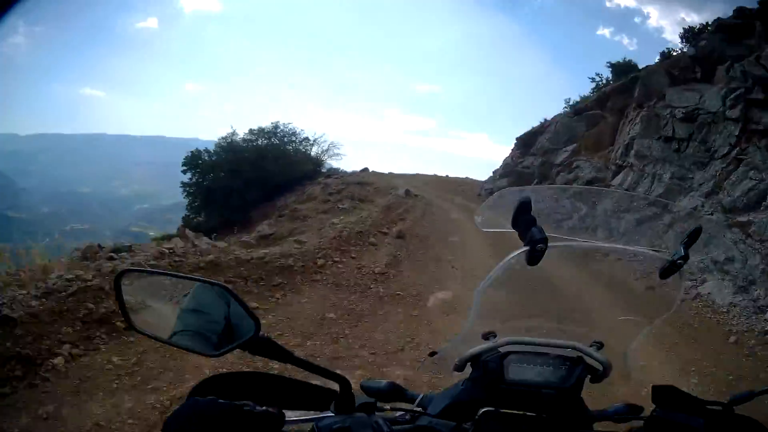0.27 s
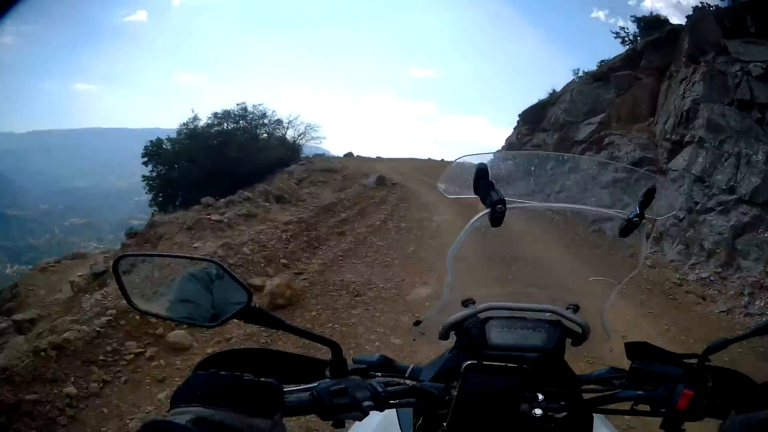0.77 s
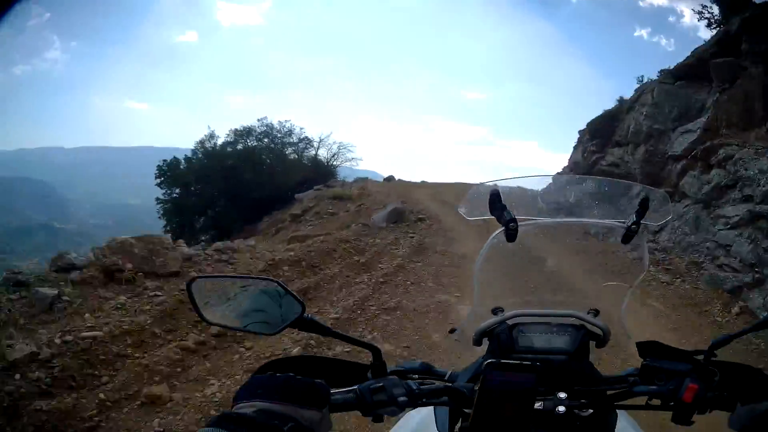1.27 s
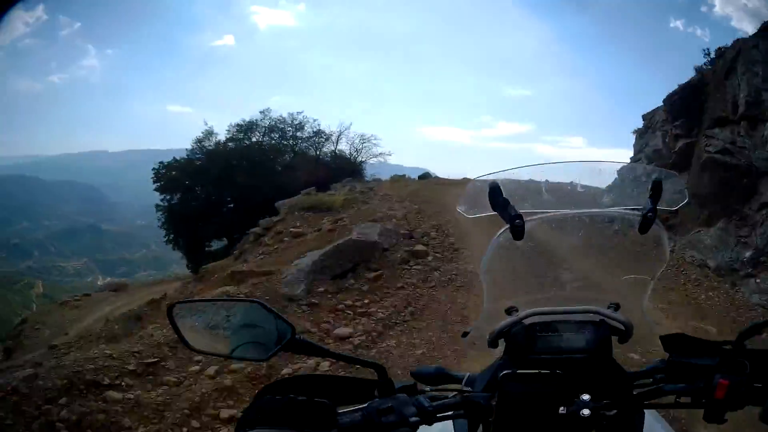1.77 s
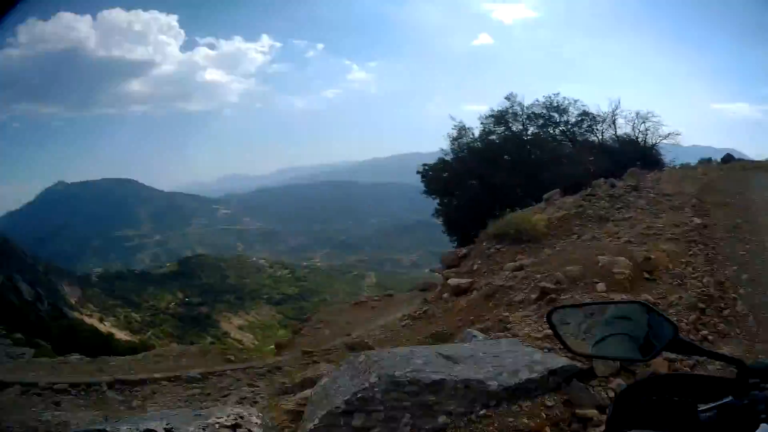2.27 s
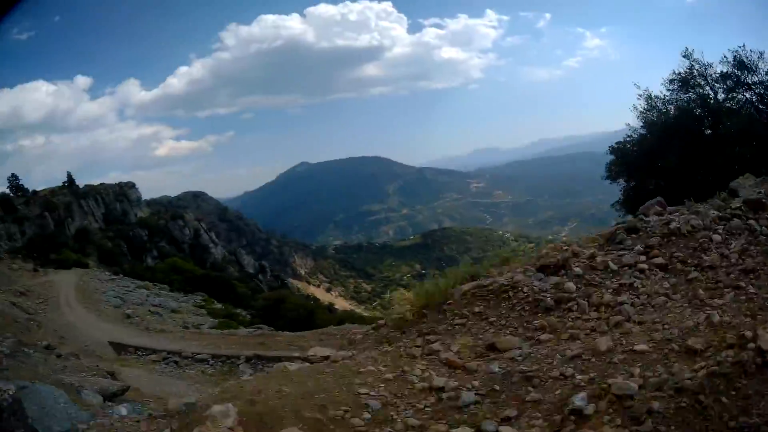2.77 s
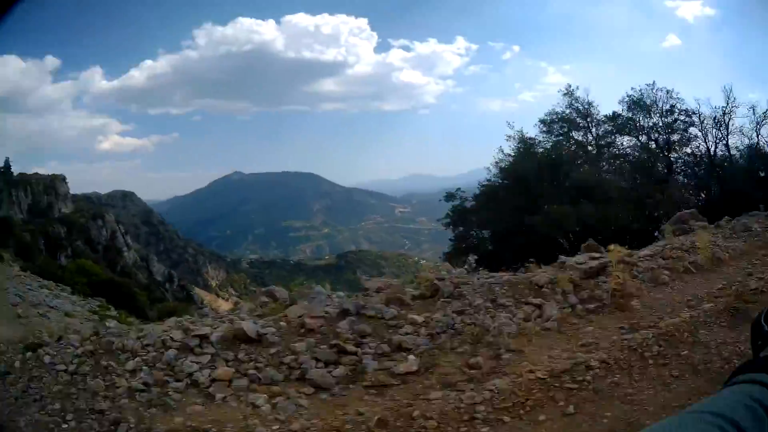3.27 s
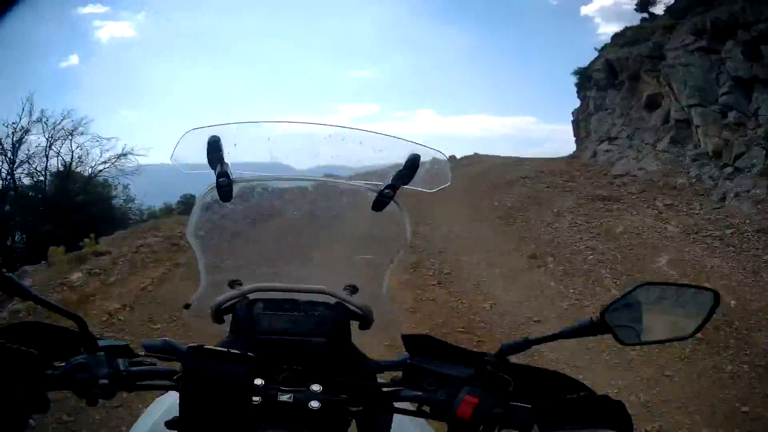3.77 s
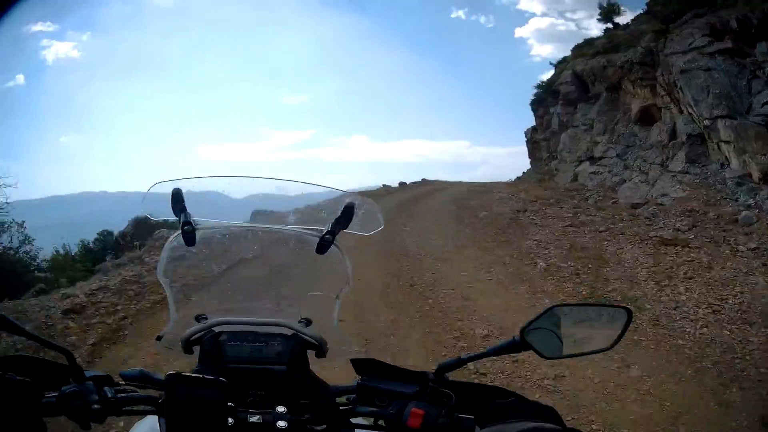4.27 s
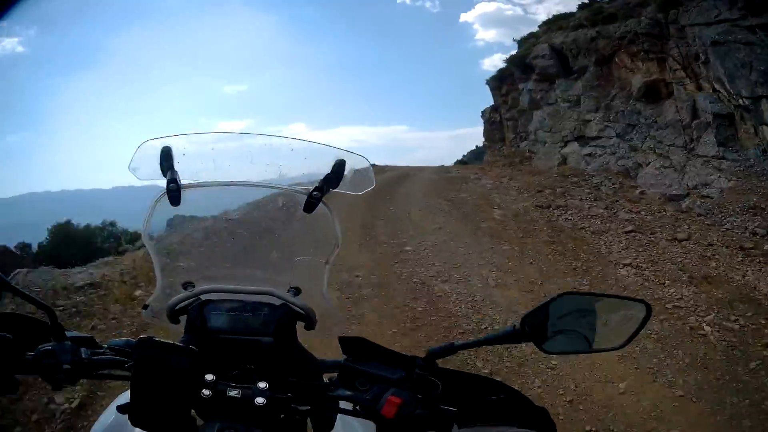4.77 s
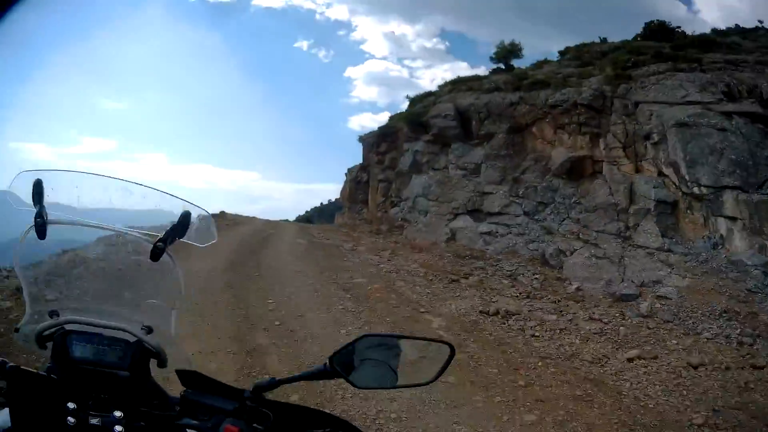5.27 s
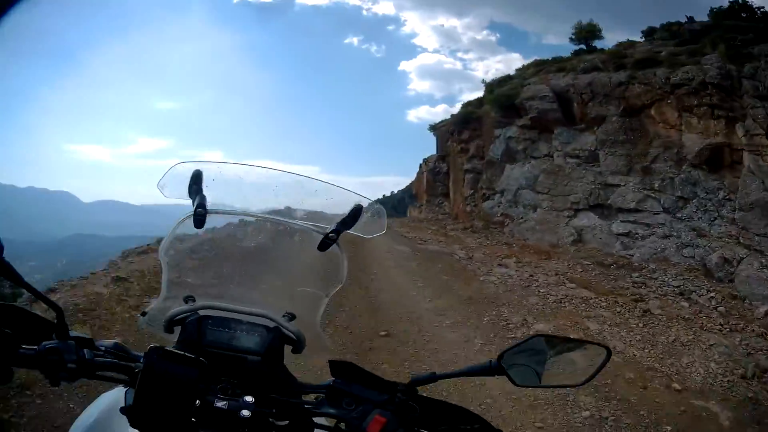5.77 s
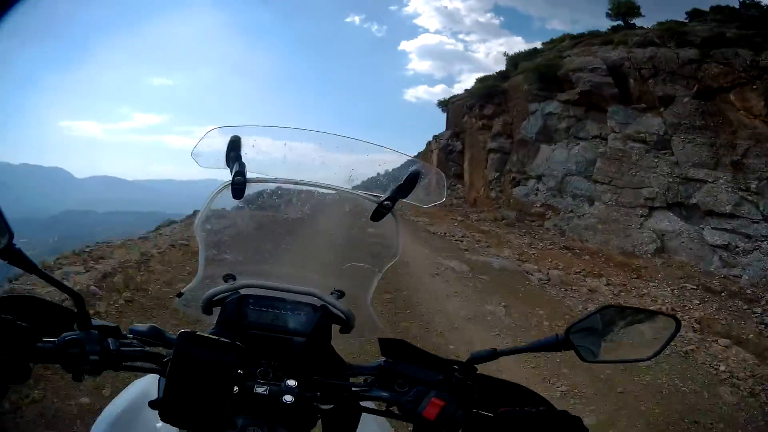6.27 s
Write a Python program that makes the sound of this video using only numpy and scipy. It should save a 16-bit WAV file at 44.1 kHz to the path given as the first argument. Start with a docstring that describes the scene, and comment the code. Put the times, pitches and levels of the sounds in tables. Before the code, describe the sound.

Heard through a padded helmet, a twin-cylinder motorcycle pulls up a rough mountain track. Its uneven, throaty burble starts fast, gradually drops to a slow chugging around five seconds, then rises again with a boomier, hollow intake honk. Dull bumps and stone knocks cluster in the first second, with scattered ticks afterwards, over soft airy rush, faint valve rattle and fine grit patter.

```python
"""On a stony track, a two-cylinder motorcycle climbs in low gear, heard by a muffled helmet microphone.
Unevenly spaced firings excite the exhaust with thumps and barks; gulps of air ring the airbox resonances.
Shaped noise gives the turbulent rush, valve-gear rattle, tyre hiss and the rumble and knocks of bumps. A gear
whines at its tooth-contact rate, a header pipe pings, grit patters on resonant panels, and sharp clicks, dull
thuds and short rings sound."""
import sys
import numpy as np
from scipy import signal
from scipy.io import wavfile
from scipy.ndimage import uniform_filter1d

SR = 44100
rng = np.random.default_rng(int(sys.argv[2]) if len(sys.argv) > 2 else 0)


def to_wav(sig):
    """Store sig (one row per channel, or 1-D mono) as 16-bit WAV at the path in sys.argv[1].

    Samples outside -1..1 are clipped; the rate is SR.
    """
    pcm = np.clip(np.atleast_2d(sig), -1, 1) * 32767
    pcm = np.round(pcm).astype(np.int16)
    wavfile.write(sys.argv[1], SR, pcm.T)  # frames by channels


N = 287091

# Engine speed: (time [s], four-stroke cycle rate [1/s])
CYCLE_RATE = [(0.0, 32.9), (0.09, 31.604), (0.19, 30.0), (0.28, 31.7), (0.4, 31.2), (0.52, 30.3),
              (0.641, 30.207), (0.788, 32.259), (0.87, 31.829), (0.955, 30.408), (1.03, 31.117),
              (1.117, 32.134), (1.18, 31.7), (1.265, 32.2), (1.31, 31.0), (1.4, 31.3), (1.49, 32.2),
              (1.54, 31.5), (1.703, 31.343), (1.87, 30.3), (1.97, 30.9), (2.069, 30.012), (2.216, 27.654),
              (2.4, 27.59), (2.6, 26.818), (2.813, 26.333), (2.953, 27.494), (3.12, 26.495),
              (3.299, 26.348), (3.43, 25.194), (3.572, 24.481), (3.684, 25.531), (3.9, 25.81),
              (4.131, 25.726), (4.183, 22.864), (4.305, 21.787), (4.45, 22.544), (4.607, 22.266),
              (4.75, 21.514), (4.9, 20.374), (5.047, 19.553), (5.12, 20.822), (5.197, 21.85),
              (5.28, 21.001), (5.358, 20.677), (5.549, 22.905), (5.7, 23.011), (5.899, 23.773),
              (6.08, 24.162), (6.261, 24.756), (6.4, 26.213), (6.51, 26.399)]
# Throttle opening, heard as intake honk ahead of the helmet lining: (time [s], level [dB])
HONK_LEVEL = [(0, -16), (.12, -28.5), (.3, -27), (.47, -34), (.6, -27.5), (.95, -28), (1.25, -25.5),
              (1.9, -28), (2.05, -27.5), (2.5, -27.5), (2.8, -31), (3.2, -19.5), (3.33, -27), (3.55, -30.5),
              (3.67, -23), (4.08, -21.5), (4.16, -26), (4.62, -29), (4.75, -31), (4.97, -29.5), (5.2, -26),
              (5.44, -18), (6.51, -16)]
MID_THROTTLE_DB = -23
# Engine balance ahead of the lining: (time [s], airbox boom [dB], exhaust thump [dB], exhaust bark [dB],
# second cylinder's lead over the first in intake [dB], in thump [dB], in bark [dB])
ENGINE_BALANCE = [(0, -54, -21, -21, 3.5, -13, 4.5), (.45, -35, -27.5, -27.5, 2, 1.5, 5.5),
                  (.75, -34.5, -28, -21.5, -15.5, -0.5, -4.5), (1.1, -33, -28.5, -21.5, -7.5, 2.5, -9),
                  (1.7, -31.5, -27.5, -21.5, -10, 4, -4), (2.05, -31.5, -23, -23, 0, -2, -6.5),
                  (2.6, -44, -23.5, -25.5, -4.5, 8, 4.5), (2.85, -38, -29, -26.5, -4, 10, 2.5),
                  (3.05, -29.5, -28.5, -29.5, -5.5, 15, 1.5), (3.25, -36.5, -25.5, -26.5, 1.5, 5.5, 8),
                  (3.35, -32, -27.5, -38.5, -3.5, 7.5, 7), (3.58, -32.5, -26, -29.5, -6.5, 4.5, 6.5),
                  (3.7, -32.5, -27, -22, -0.5, 6.5, 4), (4.1, -32.5, -30.5, -32.5, -7, 8, -2),
                  (4.2, -29.5, -26.5, -25, 0, 4, 2.5), (4.6, -29, -26.5, -25, -7.5, -1, 8),
                  (4.95, -32, -27.5, -28, -7.5, 1, 2), (5.2, -25, -46, -63.5, 4, -2, -3),
                  (5.6, -20.5, -32, -38.5, 0.5, -0.5, 0), (6.51, -20.5, -24.5, -28, 5.5, 5, 7.5)]
# Slow changes of tone: (time [s], duct echo against the direct gulp [dB], deep bark against main bark [dB],
# third engine order [dB], steady rumble of the going before its flicker [dB])
TONE_BALANCE = [(0, -4.5, -32, -26.5, -52), (.12, -4.5, -16, -24, -37.5), (.33, -3, -14.5, -23, -26.5),
                (.6, -6.5, -8, -28.5, -30), (.95, -10.5, -8.5, -46.5, -33.5), (1.2, -16, -7, -55, -35),
                (1.9, -16, -4, -41.5, -40), (2.1, -2, -8, -35, -40.5), (2.9, -1, -16, -40, -33),
                (3.3, -3, -19.5, -53, -38), (4.1, -1.5, -17, -51.5, -44.5), (4.2, -10, -28.5, -29, -41.5),
                (4.6, -4.5, -15, -35.5, -30), (5.0, -5.5, -14, -34, -45.5), (5.15, 0, -9.5, -50, -35),
                (6.51, -10, -37, -50.5, -43)]
# Intake timing as heard: (time [s], spacing of the two gulps [cycle], point midway between them [cycle],
# lag of the boom behind them [cycle])
GULP_TIMING = [(0, .46, .9925, .06), (2.8, .46, .9925, .07), (3.05, .385, .9925, .07),
               (4.15, .385, .9925, .08), (5.0, .4, .9925, .09), (5.3, .36, .9925, 0), (5.75, .36, .9925, 0),
               (5.95, .385, .985, .01), (6.51, .385, .985, .01)]
# Exhaust timing as heard: (time [s], first cylinder's firing point [cycle], spread of firing times [ms])
FIRING_TIMING = [(0, -.03, .2), (.9, -.045, .1), (1.95, -.045, .08), (2.15, .012, .2), (4.1, .012, .13),
                 (4.2, .015, .3), (5.1, .015, .3), (5.3, .012, .13), (6.51, .012, .13)]
SECOND_FIRING = 0.41  # share of the cycle
# Airbox resonances: (frequency [Hz], width [Hz], level [dB])
AIRBOX_MODES = [(316.3, 40, 5), (434, 123, -3), (476.4, 80, -3.5), (620, 220, -27)]
# Air volume of the airbox, one of two passes: (frequency [Hz], width [Hz], level [dB])
BOOM_MODE = [(113.4, 54.3, 0)]
# Exhaust pipe resonance: (frequency [Hz], width [Hz], level against the pressure swing [dB])
PIPE_MODE = [(55.6, 13, -4)]
# Silencer resonance, one of two passes: (frequency [Hz], width [Hz], level [dB])
SILENCER_MODE = [(415.5, 104, 0)]
# Deeper silencer resonance, one of two passes: (frequency [Hz], width [Hz], level [dB])
DEEP_SILENCER_MODE = [(351.1, 55, 0)]
# Header pipe resonance, one of two passes: (frequency [Hz], width [Hz], level [dB])
HEADER_MODE = [(1275, 110, 0)]
SWING_HZ = 143.6  # each firing's pressure swing is rounded above this
THIRD_PEAK_AT, THIRD_LAG_S = 0.211, 0.0029  # share midway between firings; lag through the pipe
PADDING_HZ = 600  # the helmet lining dulls the engine's breath above this

# Turbulent rush at mid throttle, before its puffing: (time [s], level [dB])
RUSH_LEVEL_DB = [(0, -24), (.9, -25), (1.1, -31), (1.85, -31), (2.0, -24), (2.5, -26.5), (3.3, -31),
                 (3.75, -28), (4.2, -27.5), (4.9, -31), (5.5, -29), (5.9, -28.5), (6.51, -29)]
# Rush spectrum before band flicker: (frequency [Hz], density [dB per Hz])
RUSH_SPECTRUM = [(120, -24.5), (200, -4.5), (300, 0), (450, 4), (600, -2.5), (750, -27), (950, -27.5)]
RUSH_STEADY, RUSH_PUFFED = 0.3, 0.6  # weights of the even flow and of the part riding on each puff
RUSH_FOLLOWS, RATTLE_FOLLOWS = 0.02, 0.38  # share of the throttle's dB swing
# Running noise; rattle is at mid throttle on smooth going, before its puff weighting:
# (time [s], engine rattle [dB], tyre hiss [dB], header ping [dB])
RUNNING_LEVELS = [(0, -52.5, -80, -60.5), (.9, -53.5, -84.5, -60.5), (1.4, -57.5, -87.5, -61.5),
                  (1.9, -53, -79.5, -59.5), (2.5, -54.5, -81.5, -71), (3.3, -58, -79.5, -69.5),
                  (3.75, -56, -71, -64), (4.1, -55, -69.5, -61), (4.2, -59.5, -69.5, -60.5),
                  (4.6, -57, -70.5, -61), (4.9, -57, -71, -58.5), (5.1, -56.5, -72, -62),
                  (5.25, -56, -73.5, -66.5), (5.5, -56.5, -78, -76), (5.9, -56.5, -83, -60.5),
                  (6.51, -55.5, -81, -59)]
# Rattle spectrum before band flicker: (frequency [Hz], density [dB per Hz])
RATTLE_SPECTRUM = [(750, 8.5), (900, 4.5), (1100, -4.5), (1340, 1.5), (1700, -8), (2100, -10.5),
                   (2500, -14.5), (3200, -12), (3800, -20.5), (4500, -32.5), (5800, -22.5)]
# Tyre hiss spectrum before band flicker: (frequency [Hz], density [dB per Hz])
HISS_SPECTRUM = [(4400, -2.5), (5000, -9), (5800, -4.5), (7000, -3), (8000, -10), (10000, -15)]
# Jolts over rocks: (time [s], rumble strength before the rise and decay [dB])
ROCK_JOLTS = [(.03, -28.5), (.261, -30), (.382, -20.5), (0.463, -21), (0.711, -17.5), (0.765, -22),
              (0.812, -21), (0.913, -24.5), (0.985, -20), (1.088, -28), (1.879, -27.5), (2.029, -28.5),
              (2.12, -41), (2.386, -28), (2.6, -36), (2.676, -28), (4.15, -43), (4.547, -32.5), (4.71, -28),
              (5.721, -43), (6.309, -22.5), (6.428, -28)]
JOLT_RISE_S, JOLT_DECAY_S = 0.0026, 0.029  # time constants
JOLT_KNOCK_DB, JOLT_RATTLE_DB = -7, -46  # helmet knock of the gear and loose parts, against the rumble
# Knock passband: lower and upper edge [Hz]
KNOCK_BAND = [240, 790]
# Gear whine under hard pull, before its flutter: (start [s], length [s], level [dB])
WHINE_BURSTS = [(3.73, 0.07, -51), (3.87, 0.3, -56), (5.452, 0.097, -60), (5.89, 0.58, -50)]
WHINE_ORDER = 55.8  # tooth contacts per engine cycle
WHINE_FADE_S, WHINE_IDLE_DB = 0.025, -80.5

# Hits, peaks before the top is dulled: # (time [s], ring peak [dB], ring frequency [Hz], click peak [dB],
# click's top frequency [Hz])
HITS = [(0.1212, -47, 1650, -68, 3960), (.381, -52, 3300, -63, 4500), (.439, -46, 3050, -69, 4000),
        (.447, -37, 1500, -68, 3000), (0.469, -50.5, 3200, -61, 5000), (0.4986, -48, 3120, -69, 4000),
        (0.711, -50.5, 2410, -59, 5200), (.7744, -40, 1720, -49.5, 9400),
        (1.92, -43, 1810, -69, 4280), (2.005, -66, 3600, -67.5, 4000),
        (2.0384, -47, 1790, -66.5, 3500), (2.087, -56, 3000, -58, 3560),
        (2.118, -58, 3300, -64, 5830), (2.1573, -42, 1520, -64, 4000),
        (2.4477, -49, 1670, -58.5, 3800), (2.493, -51, 3480, -69, 3960), (2.54, -56, 3500, -63, 4000),
        (2.576, -49, 3150, -67, 4000), (2.586, -51, 3340, -72, 3960), (2.681, -52.5, 1430, -66, 3000),
        (2.9871, -54, 1490, -62.5, 4020), (3.689, -49, 1580, -67.5, 4030),
        (3.9225, -41, 1620, -69, 3480), (4.188, -50, 1610, -64.5, 4040),
        (4.7097, -47, 1730, -65, 3500), (5.345, -45, 1800, -64, 3480),
        (6.3666, -39, 1490, -56.5, 6500), (6.443, -46.5, 1560, -59, 7000)]
# Dull thud resonance, one of two passes: (frequency [Hz], width [Hz], level [dB])
THUD_MODE = [(430, 1600, 0)]
THUD_DB = 26.5  # thud peak over the click's
# Panels under pattering grit, one of two passes: (frequency [Hz], width [Hz], level [dB])
GRIT_MODES = [(1640, 710, -0.5), (2710, 72, 1.5), (3280, 1500, -7)]
BASS_CUT_HZ, CUTOFF_HZ = 37, 13400  # bass filter corner; edge of the treble stop band


def amp(db):
    """Decibel law: level to amplitude gain."""
    return 10 ** (np.asarray(db) / 20)


def unit(x):
    """Mean-square normalisation to rms 1."""
    return x / np.sqrt(np.mean(x ** 2) + 1e-20)


def curves(rows):
    """Linear interpolation in time of each table column."""
    s, *columns = np.transpose(rows)
    return [np.interp(np.arange(N) / SR, s, c) for c in columns]


def wander(rate):
    """Slow random modulation: rms 1, with rate random knots a second joined by lines."""
    knots = rng.standard_normal(int(N / SR * 200))
    return unit(np.interp(np.arange(N) / SR * rate, np.arange(len(knots)), knots))


def butter(x, hz, kind, order=2):
    """Causal filtering with a maximally flat (Butterworth) passband."""
    return signal.sosfilt(signal.butter(order, hz, kind, fs=SR, output="sos"), x)


def resonate(x, modes):
    """Modal superposition: parallel damped resonators of alternating sign."""
    out = 0
    for k, (hz, width_hz, db) in enumerate(modes):
        radius = np.exp(-np.pi * width_hz / SR)
        poles = [1, -2 * radius * np.cos(2 * np.pi * hz / SR), radius * radius]
        ring = signal.lfilter([1, 0, -1], poles, x + 1e-18)
        out = out + (-1) ** k * amp(db) * (1 - radius * radius) / 2 * ring
    return out


def resonate_twice(x, modes):
    """Cascaded resonance: a second pass narrows the peaks and slows the onset."""
    return resonate(resonate(x, modes), modes)


def coloured(spectrum, patchy_db):
    """Band-filtered noise: each narrow band flickers alone; rms 1 ahead of the steep top cut."""
    hz, db = np.transpose(spectrum)
    edges = np.geomspace(hz[0], hz[-1], 13)
    white = rng.standard_normal((2, N))  # neighbouring bands take different noise
    out = 0
    for k, (low, high) in enumerate(zip(edges, edges[1:])):
        level_db = np.interp(np.log(low * high) / 2, np.log(hz), db) + patchy_db * wander(12)
        out = out + amp(level_db) * butter(white[k % 2], [low, high], "band")
    return butter(out, hz[-1], "low", order=8) / np.std(out)


def pulses(cycles, shares, jitter_s, spread_db):
    """Impulse excitation: a click per cylinder each cycle, uneven in time and strength."""
    out = np.zeros((2, N))
    chance = rng.standard_normal((int(cycles[-1]) + 2, 2, 2))
    jitter_s = np.broadcast_to(jitter_s, N)
    for k, share in enumerate(shares):
        due = np.interp(np.arange(len(chance)) - 1, cycles - share, np.arange(N), left=-SR, right=-SR)
        jitter = jitter_s[np.maximum(due, 0).astype(int)] * SR * chance[:, k, 0]
        at = np.round(due + jitter).astype(int)
        ok = (at >= 0) & (at < N)
        out[k, at[ok]] = amp(spread_db * chance[ok, k, 1])
    return out


def weigh(pair, lead_db):
    """Source balance: sum two cylinders with the second leading by lead_db."""
    return pair[0] * amp(-lead_db / 2) + pair[1] * amp(lead_db / 2)


def intake(cycles, per_s):
    """Cavity resonance: gulps and their duct reflection honk in the airbox, whose air volume booms."""
    honk_db, = curves(HONK_LEVEL)
    boom_db, _, _, lead_db, _, _ = curves(ENGINE_BALANCE)
    gap, mid, boom_lag = curves(GULP_TIMING)
    echo_db = curves(TONE_BALANCE)[0]
    even = 1 / np.sqrt(per_s)  # holds the level when pulses come faster
    pair = pulses(cycles, [mid - gap / 2, mid + gap / 2 - 1], jitter_s=0.00015, spread_db=1.5)
    gulps = even * weigh(pair, lead_db)
    # the pressure wave runs back along the duct and kicks the air column again
    echo = np.roll(gulps, round(0.008293 * SR)) * amp(echo_db)
    honk = unit(resonate(butter(gulps + echo, [280, 580], "band", order=3), AIRBOX_MODES))
    boom = unit(resonate_twice(even * (pair[0] + pair[1]), BOOM_MODE))
    boom = np.interp(np.arange(N) - boom_lag / per_s * SR, np.arange(N), boom)
    return amp(honk_db) * honk, amp(boom_db) * boom


def exhaust(cycles, per_s):
    """Pulse-driven pipe resonance: smooth pressure swings thump, sharp ones bark in the silencer."""
    _, thump_db, bark_db, _, thump_lead_db, bark_lead_db = curves(ENGINE_BALANCE)
    first_firing, uneven_ms = curves(FIRING_TIMING)
    deep_db = curves(TONE_BALANCE)[1]
    even = 1 / np.sqrt(per_s)
    pair = pulses(cycles, [first_firing, SECOND_FIRING], jitter_s=uneven_ms / 1000, spread_db=1.5)
    swing = butter(even * weigh(pair, thump_lead_db), SWING_HZ, "low", order=4)
    thump = unit(butter(swing + resonate(swing, PIPE_MODE), 20, "high", order=1))
    cracks = even * weigh(pair, bark_lead_db)
    bark = unit(resonate_twice(cracks, SILENCER_MODE))
    bark = bark + amp(deep_db) * unit(resonate_twice(cracks, DEEP_SILENCER_MODE))
    return amp(thump_db) * thump, amp(bark_db) * bark, pair[1]


def third_order(cycles, per_s):
    """Engine-order tone: a cosine at three times the cycle rate, delayed through the pipe."""
    third_db = curves(TONE_BALANCE)[2]
    phase = 6 * np.pi * (cycles - THIRD_PEAK_AT - THIRD_LAG_S * per_s)
    return -amp(third_db) * np.sqrt(2) * np.cos(phase)


def engine(cycles, per_s):
    """Superposition under low-pass lining: engine breath, second cylinder's firings and puff gate."""
    honk, boom = intake(cycles, per_s)
    thump, bark, second_firings = exhaust(cycles, per_s)
    puffs = uniform_filter1d(np.abs(honk + bark), size=SR // 250)
    gate = puffs / uniform_filter1d(puffs, size=SR // 10)
    breath = honk + boom + thump + bark + third_order(cycles, per_s)
    return butter(breath, PADDING_HZ, "low", order=4), second_firings, gate


def turbulent_rush(open_db, gate):
    """Turbulent flow noise: broadband sound, partly modulated by each puff."""
    level_db = curves(RUSH_LEVEL_DB)[0] + RUSH_FOLLOWS * open_db
    flow = RUSH_STEADY + RUSH_PUFFED * gate
    rush = amp(level_db) * coloured(RUSH_SPECTRUM, patchy_db=1.0) * flow
    return butter(rush, 900, "low", order=4)  # the lining rounds off the edges of each puff


def rattle(open_db, gate, shake):
    """Contact noise: valve gear follows throttle and puffs, and jolts shake loose parts."""
    level_db = curves(RUNNING_LEVELS)[0] + RATTLE_FOLLOWS * open_db
    strength = amp(level_db) * (1.56 + 0.12 * gate) + amp(JOLT_RATTLE_DB) * shake
    return strength * coloured(RATTLE_SPECTRUM, patchy_db=1.5)


def tyre_hiss():
    """Friction noise: tyres on grit give high-frequency random sound."""
    return amp(curves(RUNNING_LEVELS)[1]) * coloured(HISS_SPECTRUM, patchy_db=0.8)


def gear_whine(cycles):
    """Tooth-contact excitation: a tone locked to engine speed, stronger under load."""
    t = np.arange(N) / SR
    pull = amp(WHINE_IDLE_DB)
    for start, length, db in WHINE_BURSTS:
        from_edge = np.minimum(t - start, start + length - t)
        pull = pull + amp(db) * np.clip(from_edge / WHINE_FADE_S, 0, 1)
    tone = np.sin(2 * np.pi * WHINE_ORDER * cycles + 0.8 * wander(49))
    torque = 1 + 0.25 * np.cos(2 * np.pi * (cycles - 0.3))  # tooth load swings with crank torque
    return pull * amp(4.3 * wander(33)) * tone * torque


def header_ping(second_firings):
    """Struck resonance: the second cylinder's delayed firings ring one header pipe."""
    ping_db = curves(RUNNING_LEVELS)[2]
    delayed = np.roll(second_firings, round(0.0022 * SR))
    return amp(ping_db) * unit(resonate_twice(delayed, HEADER_MODE))


def bumps(shake):
    """Random vibration: low rumble of the going and jolts, with gear knocking on the helmet."""
    low = butter(butter(rng.standard_normal(N), 35, "high"), 220, "low", order=6)
    rumble = amp(3.5 * wander(22)) * unit(low)
    knocks = amp(JOLT_KNOCK_DB) * unit(butter(rng.standard_normal(N), KNOCK_BAND, "band", order=3))
    return (amp(curves(TONE_BALANCE)[3]) + shake) * rumble + shake * knocks


def jolts():
    """Damped impact envelope: each jolt rises quickly, then decays exponentially."""
    t, out = np.arange(N) / SR, np.zeros(N)
    for s, db in ROCK_JOLTS:
        age = np.maximum(t - s, 0)
        out += amp(db) * (1 - np.exp(-age / JOLT_RISE_S)) * np.exp(-age / JOLT_DECAY_S)
    return out


def grit():
    """Random impact excitation: fine grains patter on resonant panels."""
    struck = rng.random(N) < 90 / SR  # about 90 grains a second
    strength = amp(3 * np.minimum(rng.exponential(1, N), 3))
    grains = struck * strength * rng.choice([-1, 1], N)
    return amp(-65.5) * unit(butter(resonate_twice(grains, GRIT_MODES), 4000, "low", order=6))


def hits():
    """Impact and modal response: each hit gives a click, a thud and a short ring."""
    out, size = np.zeros(N), 2048
    touch = signal.unit_impulse(size)
    tick = butter(butter(touch, 400, "high", order=1), 1000, "low", order=1)
    thud = resonate_twice(touch, THUD_MODE)
    thud = amp(THUD_DB) * thud / thud.max()
    for s, ring_db, hz, click_db, top_hz in HITS:
        ring = resonate_twice(touch, [(hz, 240, 0)])
        click = butter(tick, top_hz, "low", order=2) / tick.max()
        hit = amp(ring_db) * ring / ring.max() + amp(click_db) * (click + thud)
        hit = butter(hit, top_hz, "low", order=6)  # the hit is dulled above its top frequency
        at = round((s + 0.0015) * SR)  # sounds 1.5 ms after the listed time
        out[at:at + size] += hit[:N - at]
    return out


def scene():
    """Linear superposition of all sources at one microphone."""
    per_s, = curves(CYCLE_RATE)
    cycles = np.cumsum(per_s) / SR
    breath, second_firings, gate = engine(cycles, per_s)
    open_db = curves(HONK_LEVEL)[0] - MID_THROTTLE_DB
    shake = jolts()
    machine = turbulent_rush(open_db, gate) + rattle(open_db, gate, shake)
    machine = machine + gear_whine(cycles) + header_ping(second_firings)
    ground = tyre_hiss() + bumps(shake) + grit() + hits()
    return (breath + machine + ground)[None]


def record(dry):
    """Band limitation: a zero-phase bass cut and a steep treble cut."""
    thin = signal.sosfiltfilt(signal.butter(4, BASS_CUT_HZ, "high", fs=SR, output="sos"), dry)
    return signal.sosfilt(signal.cheby2(12, 70, CUTOFF_HZ, fs=SR, output="sos"), thin)


dry = scene()
out = record(dry)
to_wav(out)
```